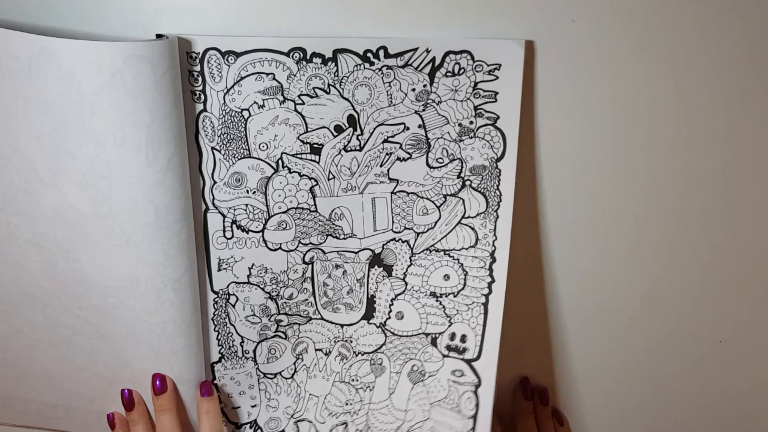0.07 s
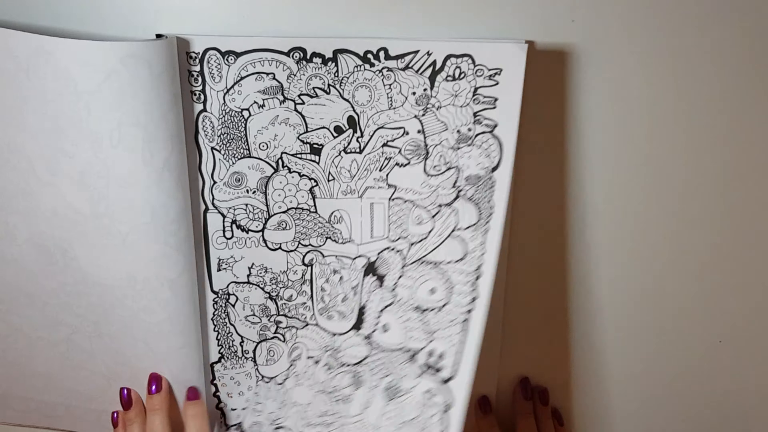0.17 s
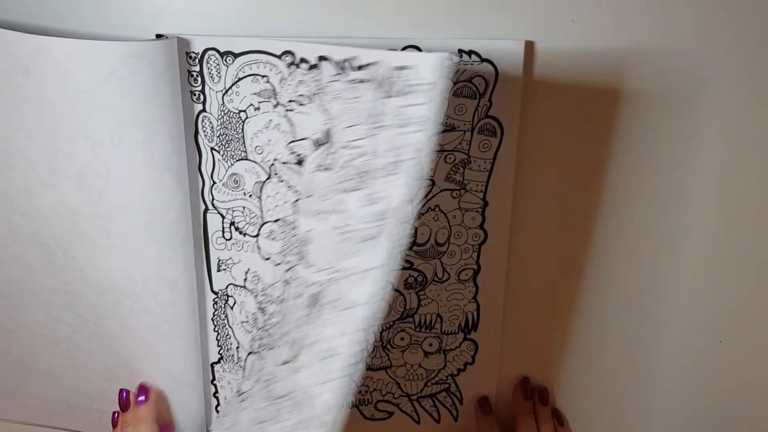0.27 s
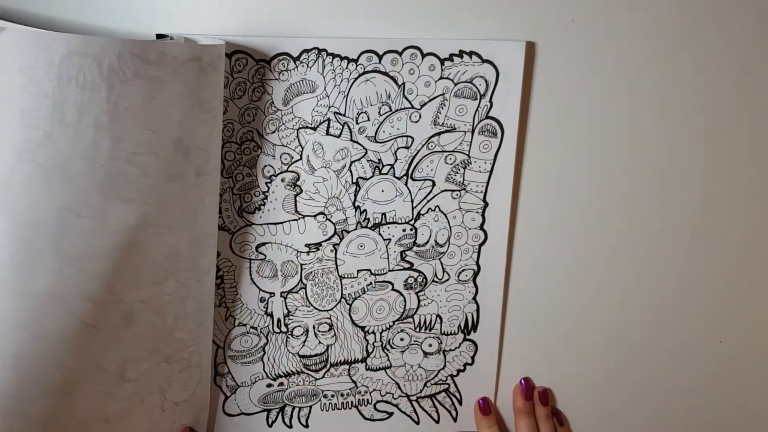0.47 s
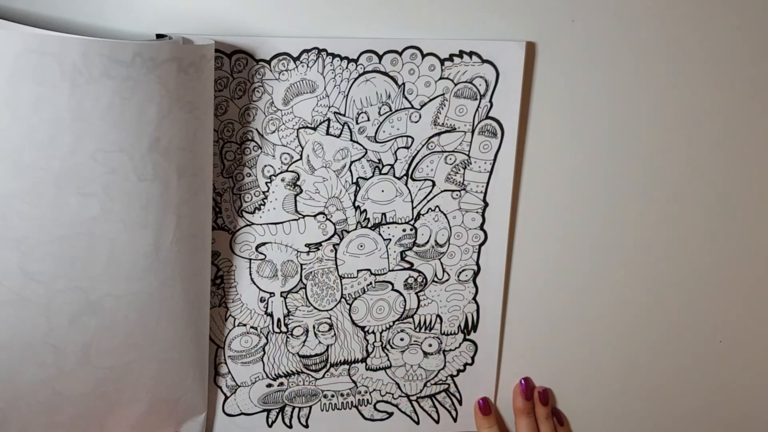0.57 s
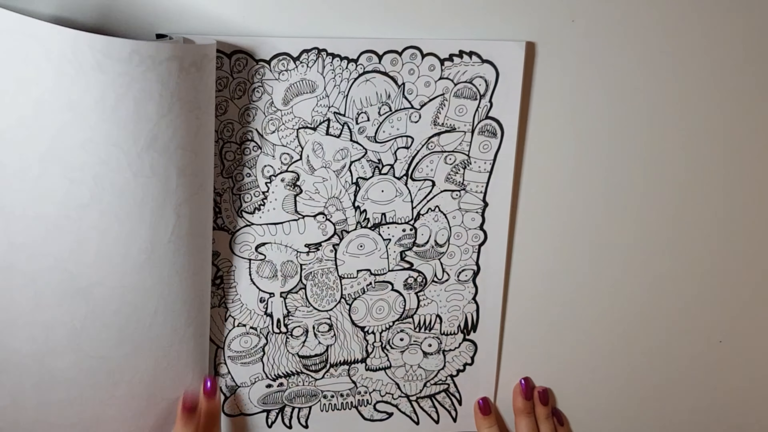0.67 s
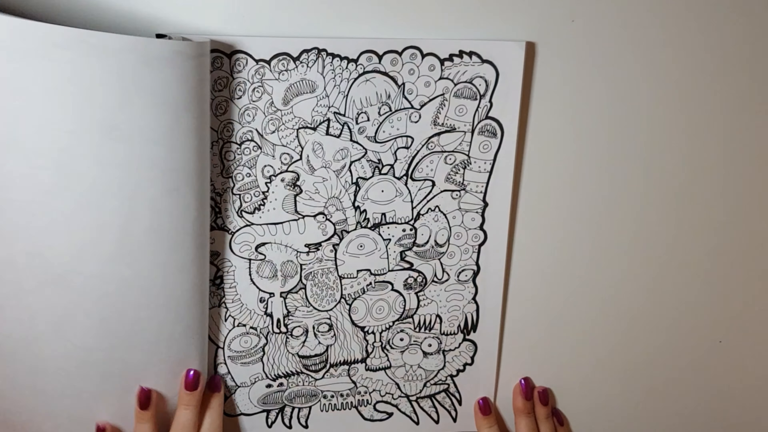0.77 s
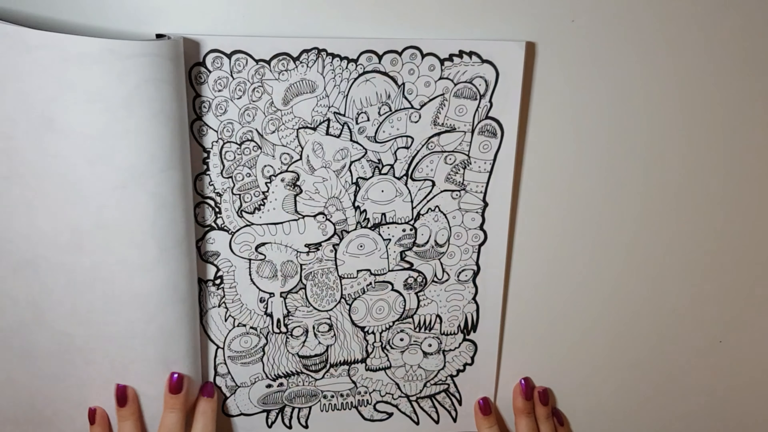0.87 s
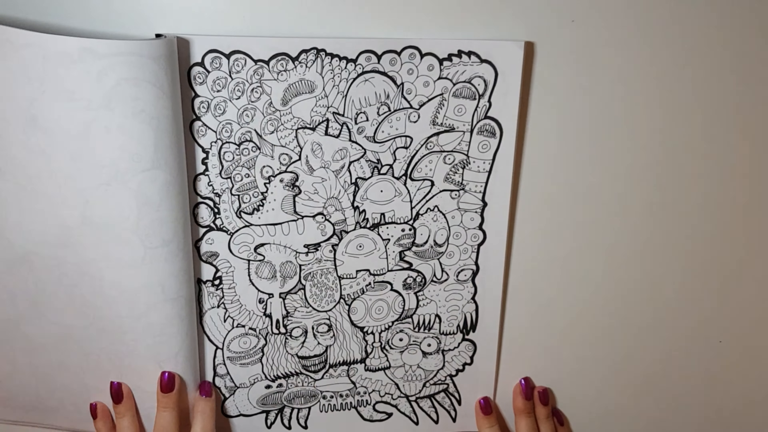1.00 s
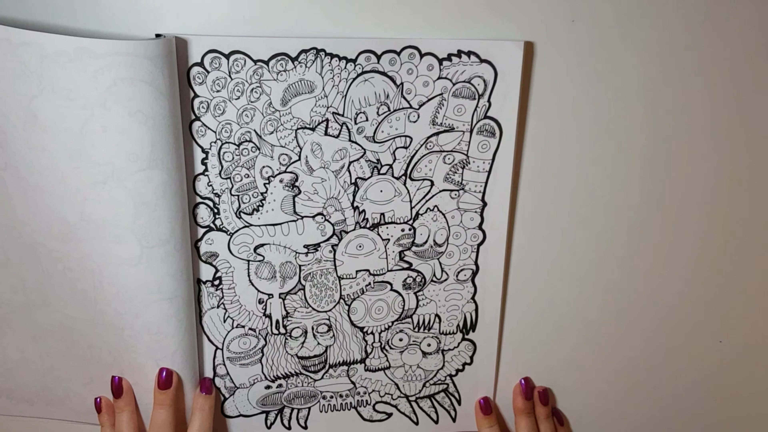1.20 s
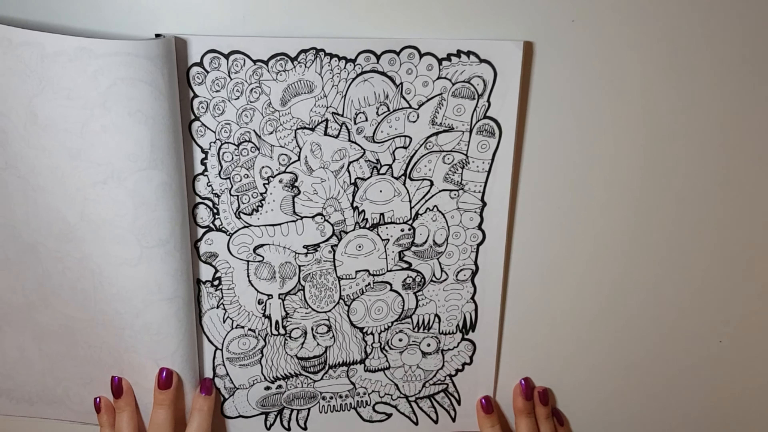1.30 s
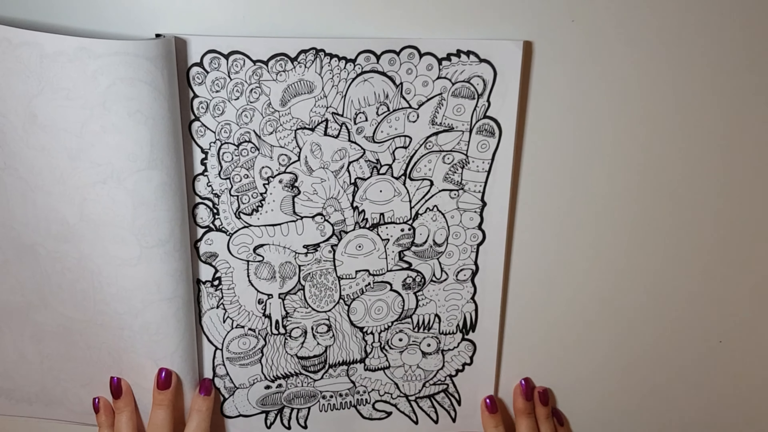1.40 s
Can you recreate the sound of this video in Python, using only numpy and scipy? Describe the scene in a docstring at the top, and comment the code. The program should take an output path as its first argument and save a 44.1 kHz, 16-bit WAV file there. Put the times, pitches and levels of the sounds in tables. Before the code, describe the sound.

Paper page turn up close: soft sliding hiss, brief crackles, one sharp snap, then faint smoothing

```python
"""Turning a book page

A hand lifts a book page, turns it over and smooths it flat on a table in a quiet room.
Skin and paper slide with a fine hiss, made of dense random clicks shaped in third-octave bands.
The bending sheet crackles and snaps: clicks set short rings going, and the pages below ring along.
The table top booms faintly from noise-driven modes; a short room echo and a steady background surround it."""
import sys
import numpy as np
from scipy import signal
from scipy.io import wavfile
from scipy.ndimage import uniform_filter1d

SR = 44100
rng = np.random.default_rng(int(sys.argv[2]) if len(sys.argv) > 2 else 0)


def transcribe(signal):
    """Save signal, clipped to [-1, 1], as a 16-bit WAV file at the path in sys.argv[1]."""
    frames = np.atleast_2d(signal).T
    limited = np.clip(frames, -1, 1)
    pcm = np.round(limited * 32767).astype(np.int16)
    wavfile.write(sys.argv[1], SR, pcm)


def boost_factor(decibels):
    """Convert a level in decibels to a linear amplitude factor."""
    exponent = np.asarray(decibels, float) / 20
    return 10 ** exponent


N = 63945

# room and microphone background: f/Hz, level/dB per Hz (relative)
BACKGROUND_COLOUR = [(20, -33), (30, -25.5), (55, -5), (110, -5.5), (160, -13), (250, -13.5), (400, -18),
                     (620, -18.5), (1000, -21.5), (2000, -32), (4000, -28.5), (7000, -37), (11000, -25.5),
                     (16000, -18)]
# background likeness of left and right: f/Hz, likeness (1 = identical)
BACKGROUND_LIKENESS = [(25, 0.38), (60, 0.34), (150, 0.61), (300, 0.35), (1000, 0.14), (15000, 0.036)]
# sliding: t/s, level/dB (of the untilted hiss above 3.5 kHz), left-right/dB (reduced in the treble),
# low tilt/dB per octave below 4 kHz, treble tilt/dB per octave above 6 kHz
SLIDE_MOVES = [(0, -54, 5.5, -0.2, -2), (.022, -63, 7, 1, -5.5), (.1, -56.5, 7.5, -1.7, -0.3),
               (.228, -48.5, 7.5, -2, -0.5), (.246, -62, 7.5, 1, 5.5), (.3, -64, 9, 7.5, -3.5),
               (.335, -57.5, 3, 0, -5.5), (.41, -57, 0.5, 3.5, 3.5), (.44, -53, 6, 7.5, 2.8),
               (.49, -50, 5.5, 0.5, 3), (.512, -53.5, 5, 4, -4), (.55, -52.5, 6, 0.1, -0.7),
               (.62, -57, 3.5, -0.2, 0.5), (.652, -67.5, 0.5, 4, -0.5), (.696, -61.5, 4, -1, 6),
               (.766, -70, 3, -2, 2.5), (.771, -52.5, 6.5, -3, 8), (.83, -54.5, 6.5, -1, 0.5),
               (.875, -52.5, 7, -7, -2), (.91, -54, 7.5, -3, -6), (.946, -48, 5, -2.2, -1.1),
               (.975, -58, 8, -1, 2.5), (1.002, -63.5, 5.5, -2.5, 2), (1.05, -61.5, 4, 0.5, 0),
               (1.15, -75.5, 5.5, -9, 5), (1.198, -64, 3.5, -6.5, 5), (1.258, -77, 1.5, -7.5, 1.5),
               (1.374, -81, 3.5, 0, 2), (1.402, -62.5, 5.5, 0.4, 12.5), (1.45, -58, 6.5, -1, .1)]
# hiss of skin on paper before tilting: f/Hz, level/dB per Hz (relative)
SLIDE_SPECTRUM = [(180, -58), (300, -60), (543, -7.5), (900, -2), (1490, -1.5), (2400, -1.5), (3180, -3.5),
                  (4490, -5), (5300, 0), (7140, -13.5), (9000, -7.5), (11700, -7), (14500, -11.5),
                  (18000, -29)]
# sliding likeness of left and right: f/Hz, likeness (1 = identical)
SLIDE_ALIKE = [(300, 0.55), (1000, 0.29), (3000, 0.1), (15000, 0.04)]
# hands working on the table top: t/s, level/dB of its boom
TABLE_PUSHES = [(0.0, -59), (0.06, -87), (0.24, -69.5), (0.292, -53.5), (0.325, -67.5), (0.42, -76),
                (0.46, -54), (0.52, -57), (0.588, -74.5), (0.774, -98), (0.798, -63), (0.85, -88),
                (0.902, -60.5), (1.03, -86)]
# low modes of the table top: f/Hz, level/dB (relative), t60/s of each of two rings in a row
TABLE_RINGS = [(119, 0, .05), (165, -11, .03), (250, -15, .02)]
# bending sheet: t/s, level/dB, centre f/Hz, left-right/dB
FLEX_MOVES = [(.25, -91, 1200, 2.5), (.275, -45, 1200, 14), (.280, -42, 1464, 0), (.3, -64, 806, 0),
              (.322, -66, 990, -9), (.34, -55.5, 1430, 1), (.425, -62.5, 1000, 9), (.431, -38, 1800, 7.5),
              (.45, -41, 1310, -3), (.459, -51, 1370, 1), (.475, -46, 640, 7), (.52, -54, 730, 3),
              (.558, -65, 970, 10), (.612, -60, 623, 2), (.645, -66, 620, 0), (.672, -58, 805, 4),
              (.694, -50, 1150, 3.5), (.708, -57, 1250, 4), (.766, -70, 1200, 6), (.772, -47.5, 1480, 5),
              (.84, -57.5, 1750, 4.5), (.880, -56, 1650, 6), (.886, -25.5, 2100, 0),
              (.891, -34.5, 1810, 3.5), (.901, -45.5, 1760, 10.5), (.93, -58, 1200, 6),
              (.956, -53, 770, 5.5), (1.0, -73, 780, 8), (1.046, -67.5, 600, 12), (1.075, -76, 557, 2),
              (1.12, -80, 600, 6)]
# buckling snaps: t/s, level/dB (before the partials' own), f/Hz, left-right/dB (held within 6),
# ring/cycles to fall 60 dB, overtone slope/dB per octave
SNAP_EVENTS = [(0.2688, -41.5, 1187, -1, 36, -18), (0.2743, -31.5, 1330, 6, 15.4, 2.5),
               (0.4304, -36, 1460, 5, 16, 1), (0.4328, -35.5, 1280, -9, 12, 0.5),
               (0.4339, -32, 1660, 1, 17, -9), (.4385, -41, 648, -4, 11.6, -18),
               (0.4434, -35, 1320, -5, 19, -1), (.4474, -39, 660, 3, 18, -4), (.4535, -42, 780, 3, 16, 3),
               (.4720, -44, 720, 3, 18, -2), (.6200, -51, 570, 3, 18, -8), (.6540, -52, 630, 4, 18, -8),
               (.6790, -54, 780, 1.5, 16, -6), (.6900, -47, 1000, 2.5, 16, -3),
               (.6945, -47, 1400, 2.5, 14, -6), (.7030, -56, 1240, 6, 21, -13),
               (0.7696, -41.5, 1360, 4, 30, -1.5), (.8000, -48, 1370, 0, 28, 8),
               (0.8825, -38, 1150, 6, 6.6, 5.5), (.8842, -37, 1530, 3, 8, 1.5),
               (.8859, -30, 1400, 2, 8, -2), (.8877, -35, 2050, 2, 9, 1.5),
               (.9560, -50.5, 723, -6, 13.7, 3.5), (1.038, -61.5, 750, -1, 12, 3),
               (1.045, -60, 547, 0, 27, 0), (1.068, -69, 533, -4, 15, -20)]
# partials of a snap: frequency ratio, level/dB
PARTIALS = [(.55, -3.5), (.8, -4.5), (1.01, 7), (1.25, 0.5), (1.7, -9), (2.15, 0), (2.6, 0.5), (3.1, -3.5),
            (3.8, -6.5), (4.6, -23)]
# chance spread of a partial: level/dB, pitch share, phase (in units of PORT_PHASE_RAD),
# delay/s (only for ratios above 1.5)
PARTIAL_SPREAD = [1.5, .03, .3, .0014]
# the pile of pages ringing along: f/Hz, coupling/dB (further scaled by frequency), t60/s
BOOK_RINGS = [(565, -32.5, 0.079), (652.4, -33.5, 0.12), (750, -36.5, 0.063)]

BACKGROUND_DB = -68.5
SLIDE_GRAINS_PER_S, SLIDE_SPREAD_DB, SLIDE_PATCHY_DB = 12000, 2, 1.2
TABLE_SIDE_DB = -9
ROOM_T60_S, WALL_CUT_HZ, ROOM_DB = 0.2, 3100, -15.5
FLEX_PER_S, FLEX_SPREAD_DB = 5000, 2.0
FLEX_CYCLES, FLEX_OCTAVES = 8, 0.51  # ring length to -60 dB; spread of pitch around the centre
SNAP_RISE_S = .00006
SHEET_LOW_HZ = 430
LEFT_LAG_S = .00009
PORT_PHASE_RAD = 1.88  # left-right phase of a ringing patch per unit of chance
MIC_DIP_HZ, MIC_DIP_WIDE_HZ, MIC_DIP_DB = 6690, 1200, -3.5
TOP_CUT_HZ = 16000
TREBLE_PAN_SHARE = 0.2  # above the dip the ports hear nearly the same balance


def rms_one(x):
    """Scales to an rms of 1."""
    return x / np.sqrt(np.mean(x ** 2) + 1e-20)


def in_time(rows):
    """Draws each column as a line through time."""
    s, *columns = np.transpose(rows)
    return [np.interp(np.arange(N) / SR, s, c) for c in columns]


def at_hz(points, hz):
    """Reads a curve at a frequency, on a log frequency scale."""
    f, values = np.transpose(points)
    return np.interp(np.log(hz), np.log(f), values)


def drift(rate):
    """Slow chance, spread 1: low-passed noise made at every 40th sample."""
    r = np.exp(-80 * np.pi * rate / SR)
    white = rng.standard_normal(N // 40 + 2002)
    slow = signal.lfilter([1], [1, -2 * r, r * r], white)[2000:]
    return np.interp(np.arange(N) / 40, np.arange(len(slow)), rms_one(slow))


def grains(per_s, spread_db, shape):
    """Random clicks of either sign with a long tail of sizes."""
    size_db = spread_db * np.minimum(rng.exponential(1, shape), 3.5)
    sizes = boost_factor(size_db) * rng.choice([-1, 1], shape)
    return sizes * (rng.random(shape) < per_s / SR)


def ring(clicks, hz, t60, phase=0):
    """A unit click sets a decaying sine of height 1 ringing."""
    r = boost_factor(-60 / (t60 * SR))
    w = 2 * np.pi * min(hz, SR / 3) / SR
    start = [np.sin(phase), r * np.sin(w - phase)]
    return signal.lfilter(start, [1, -2 * r * np.cos(w), r * r], clicks + 1e-18)


def ring_pair(clicks, hz, t60, chance):
    """One patch of sheet, reaching the two ports with a phase of its own."""
    half = PORT_PHASE_RAD * chance / 2
    return np.array([ring(clicks, hz, t60, -half), ring(clicks, hz, t60, half)])


def soften(x, seconds):
    """A contact that takes time: double one-pole low-pass."""
    r = np.exp(-1 / (seconds * SR))
    return signal.lfilter([(1 - r) ** 2], [1, -2 * r, r * r], x)


def placed(x, pan_db):
    """Left-right balance; the left port hears it a little later."""
    late = np.interp(np.arange(N) - LEFT_LAG_S * SR, np.arange(N), x[0])
    return np.array([late * boost_factor(pan_db / 2), x[1] * boost_factor(-pan_db / 2)])


def banded(white, spectrum, likeness, patchy_db, tilt_db=0, treble_db=0, pan_db=0):
    """Third-octave bands, each with its own level, flicker and left-right likeness."""
    out, power = 0, 0
    edges = 20 * 2 ** np.arange(0, 10.1, 1 / 3)
    for k, (low, high) in enumerate(zip(edges, edges[1:])):
        # neighbouring bands draw on different noise
        band = signal.butter(2, [low, high], "band", fs=SR, output="sos")
        mid, side = signal.sosfilt(band, white[k % 2])
        hz = np.sqrt(low * high)
        alike = np.clip(at_hz(likeness, hz), -1, 1)
        plain_db = at_hz(spectrum, hz)
        low_tilt = tilt_db * max(np.log2(4000 / hz), 0)
        treble_tilt = treble_db * max(np.log2(hz / 6000), 0)
        pan_share = TREBLE_PAN_SHARE if hz > MIC_DIP_HZ else 1
        balance = boost_factor(np.multiply([[.5], [-.5]], pan_db) * pan_share)
        gain = boost_factor(plain_db + low_tilt + treble_tilt) * balance
        stereo = np.sqrt(1 + alike) * mid + np.sqrt(1 - alike) * side * [[1], [-1]]
        out = out + gain * boost_factor(patchy_db * drift(15)) * stereo
        # a moving low tilt leaves only the bands above 3.5 kHz to set the loudness
        if hz > 3500 or np.ndim(tilt_db) == 0:
            power = power + boost_factor(plain_db) ** 2 * (high - low)
    return out / np.sqrt(4 * power / SR)


def background():
    """Room and microphone background: noise in gently flickering bands."""
    white = rng.standard_normal((2, 2, N))
    return boost_factor(BACKGROUND_DB) * banded(white, BACKGROUND_COLOUR, BACKGROUND_LIKENESS, patchy_db=1.8)


def slide():
    """Fibres catch and let go thousands of times a second; grip changes the balance of low and high."""
    level_db, pan_db, tilt_db, treble_db = in_time(SLIDE_MOVES)
    fibres = rms_one(grains(SLIDE_GRAINS_PER_S, SLIDE_SPREAD_DB, (2, 2, N)))
    hiss = banded(fibres, SLIDE_SPECTRUM, SLIDE_ALIKE, SLIDE_PATCHY_DB, tilt_db, treble_db, pan_db)
    return hiss * boost_factor(level_db)


def table():
    """Uneven pressure keeps the low modes of the table top humming loosely."""
    (level_db,) = in_time(TABLE_PUSHES)
    push = rng.standard_normal((2, N))
    hum = 0
    for hz, mode_db, t60 in TABLE_RINGS:
        mode = ring(ring(push, hz, t60), hz, t60)
        hum = hum + boost_factor(mode_db) * rms_one(mode)
    # even out the hum's own swells so that the pushes set the level
    swell = uniform_filter1d(hum ** 2, size=2000) + .3 * np.mean(hum ** 2)
    mid, side = hum / np.sqrt(swell)
    return boost_factor(level_db) * (mid + boost_factor(TABLE_SIDE_DB) * side * [[1], [-1]])


def room(x):
    """Eight feedback delays a side, duller on every round."""
    out = np.zeros((2, N))
    dull = np.exp(-2 * np.pi * WALL_CUT_HZ / SR)
    lags = (rng.uniform(.008, 0.044, 16) * SR).astype(int)
    for k, lag in enumerate(lags):
        loop, state = x.copy(), [0.]
        gain = boost_factor(-60 * lag / SR / ROOM_T60_S)
        for i in range(lag, N, lag):
            back, state = signal.lfilter([gain * (1 - dull)], [1, -dull], loop[i - lag:i], zi=state)
            loop[i:i + lag] += back[:N - i]
        out[k % 2] += (loop - x) * (-1) ** (k // 2)
    return out


def flex():
    """Small buckles ring a few cycles at pitches around a moving centre."""
    level_db, centre_hz, pan_db = in_time(FLEX_MOVES)
    pitches = np.geomspace(380, 6500, 26)
    clicks = grains(FLEX_PER_S, FLEX_SPREAD_DB, N)
    dealt = rng.integers(0, 26, N)  # which pitch each click sets ringing
    chance = rng.normal(0, 1, 26)
    shares = [np.exp(-.5 * (np.log2(p / centre_hz) / FLEX_OCTAVES) ** 2) for p in pitches]
    power = sum(share ** 2 / p for share, p in zip(shares, pitches))
    t = np.arange(N) / SR
    moving = (t > FLEX_MOVES[0][0]) * (t < FLEX_MOVES[-1][0])
    strength = clicks * moving * boost_factor(level_db) / np.sqrt(power)
    crackle = 0
    for k, p in enumerate(pitches):
        struck = strength * (dealt == k) * shares[k]
        crackle = crackle + ring_pair(struck, p, FLEX_CYCLES / p, chance[k])
    # expected loudness of the rings, so that the level column sets the result
    unit = np.sqrt(np.mean(clicks ** 2) / 26 * FLEX_CYCLES * SR / (4 * np.log(1000)))
    return placed(crackle / unit, pan_db)


def snaps():
    """Each snap runs across a patch of sheet in a millisecond or two; its partials vary by chance."""
    out = np.zeros((2, N))
    for s, level_db, hz, pan_db, cycles, slope_db in SNAP_EVENTS:
        chance = rng.normal(0, 1, (len(PARTIALS), 4)) * PARTIAL_SPREAD
        snap = 0
        for k, (ratio, partial_db) in enumerate(PARTIALS):
            more_db, detune, phase, delay = chance[k]
            start = int((s + abs(delay) * (ratio > 1.5)) * SR)
            overtone_db = slope_db * max(np.log2(ratio), 0)
            click = np.zeros(N)
            click[start] = (-1) ** k * boost_factor(level_db + partial_db + overtone_db + more_db)
            t60 = cycles / hz / ratio ** 0.1
            snap = snap + ring_pair(click, hz * ratio * (1 + detune), t60, phase)
        out += placed(soften(snap, SNAP_RISE_S), np.clip(pan_db, -6, 6))
    return out


def book(sheet):
    """The pages below take up the sheet's motion and ring along with it."""
    along = 0
    for hz, coupling_db, t60 in BOOK_RINGS:
        along = along + boost_factor(coupling_db) * ring(sheet, hz, t60) * 2 * np.pi * hz / SR
    return sheet + along


def scene():
    """Paper close to the microphone, with table, room and background; a thin sheet radiates no bass."""
    thin = signal.butter(4, SHEET_LOW_HZ, "high", fs=SR, output="sos")
    paper = signal.sosfilt(thin, slide() + book(flex() + snaps()))
    echo = boost_factor(ROOM_DB) * room(paper.mean(axis=0))
    return paper + table() + echo + background()


def band_limit(x):
    """A steep low-pass at the top of the band."""
    return signal.sosfilt(signal.butter(12, 16410, fs=SR, output="sos"), x)


def record(dry):
    """A dip in the treble, then a steep low-pass that limits the top."""
    b, a = signal.iirpeak(MIC_DIP_HZ, MIC_DIP_HZ / MIC_DIP_WIDE_HZ, SR)
    dipped = dry - (1 - boost_factor(MIC_DIP_DB)) * signal.lfilter(b, a, dry)
    top_cut = signal.cheby2(12, 60, TOP_CUT_HZ, fs=SR, output="sos")
    finished_mix = signal.sosfilt(top_cut, dipped)
    return band_limit(finished_mix)


dry = scene()
out = record(dry)
transcribe(out)
```